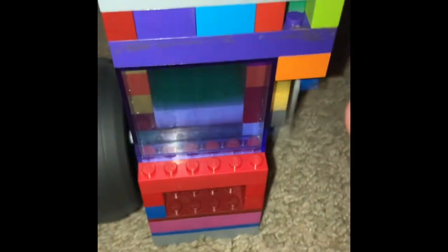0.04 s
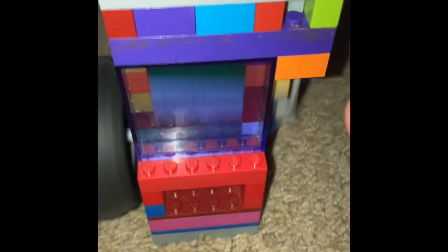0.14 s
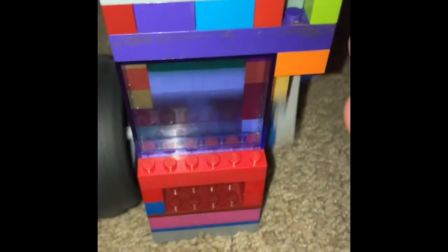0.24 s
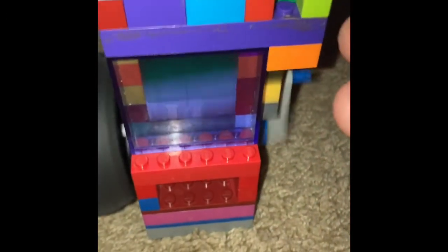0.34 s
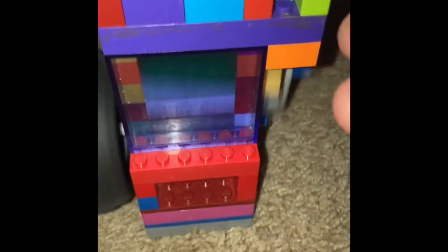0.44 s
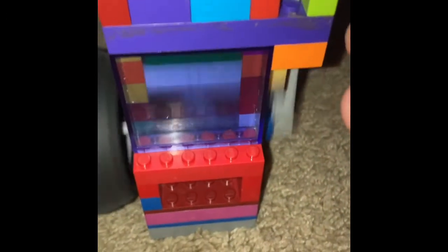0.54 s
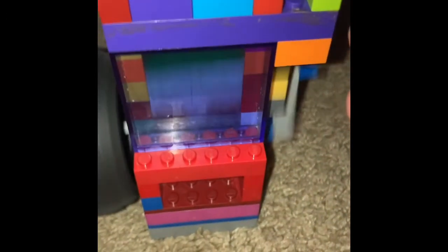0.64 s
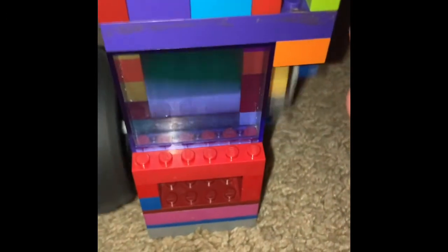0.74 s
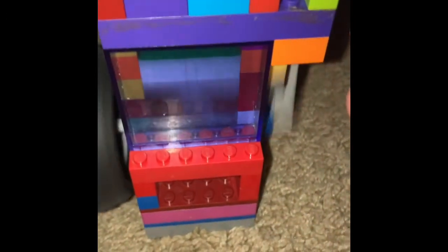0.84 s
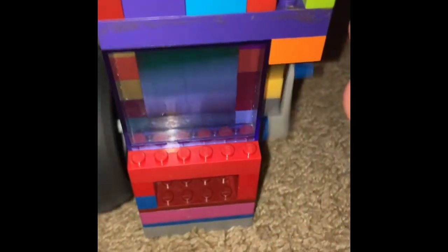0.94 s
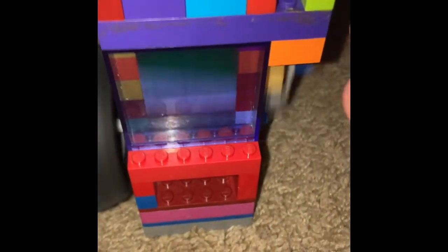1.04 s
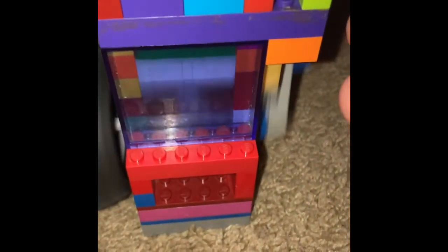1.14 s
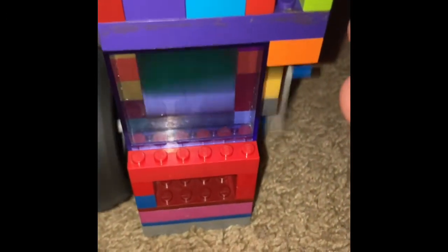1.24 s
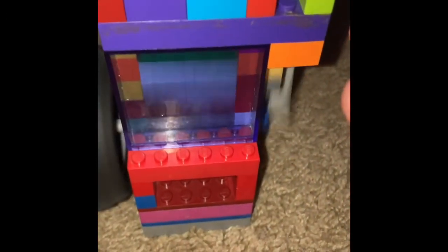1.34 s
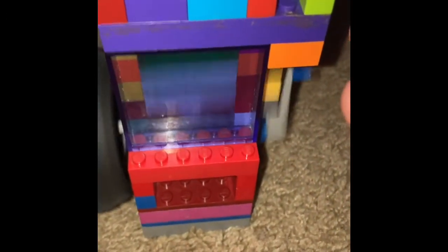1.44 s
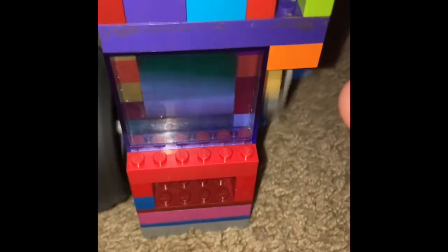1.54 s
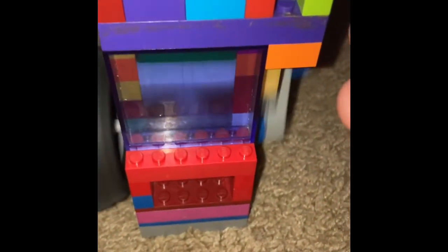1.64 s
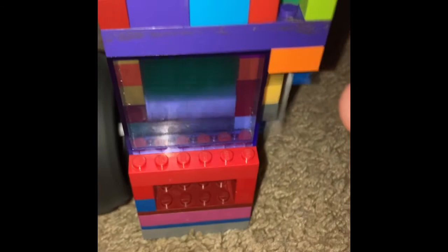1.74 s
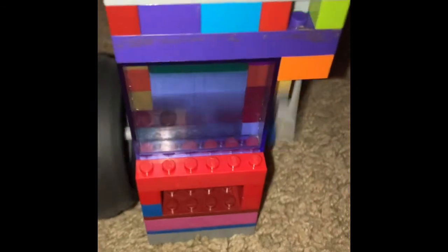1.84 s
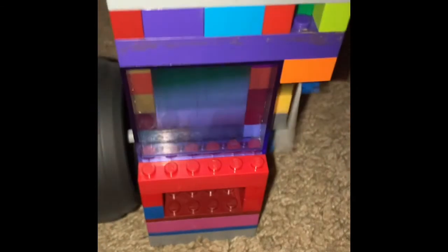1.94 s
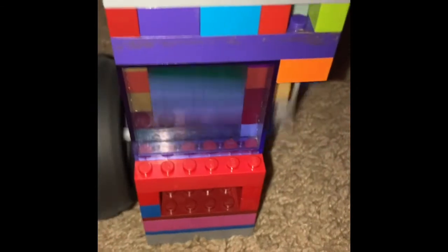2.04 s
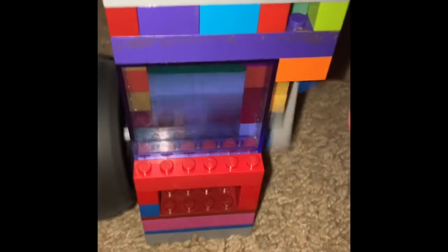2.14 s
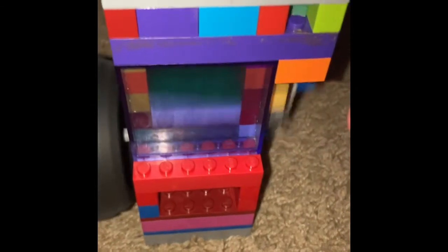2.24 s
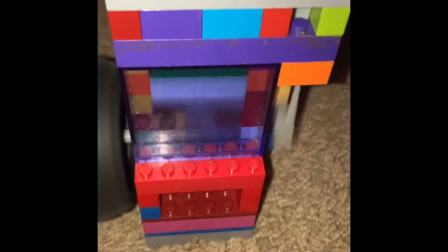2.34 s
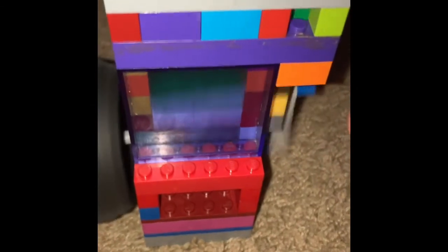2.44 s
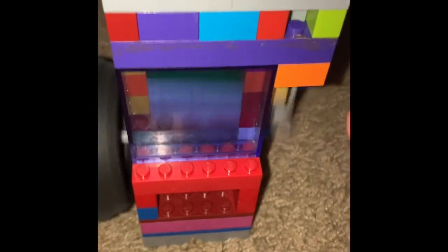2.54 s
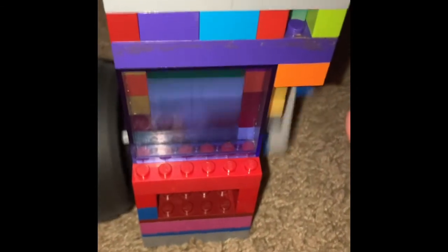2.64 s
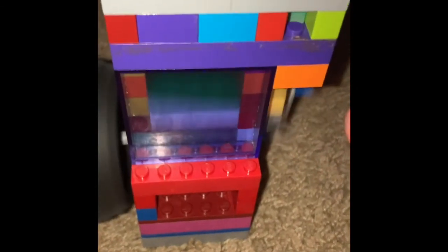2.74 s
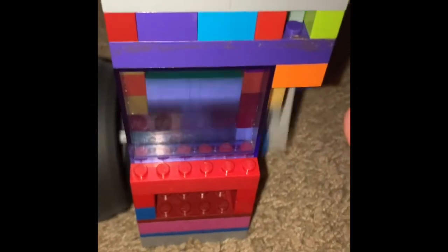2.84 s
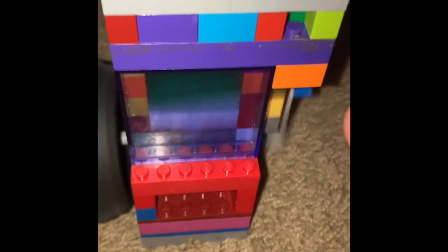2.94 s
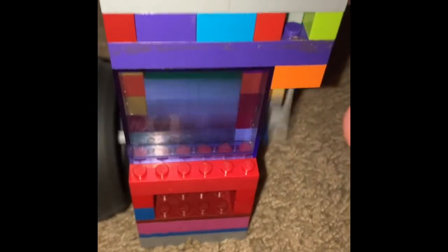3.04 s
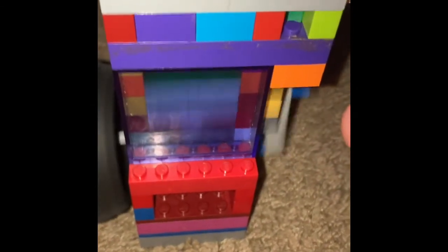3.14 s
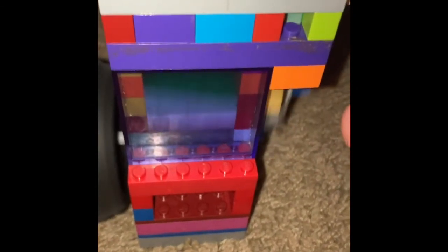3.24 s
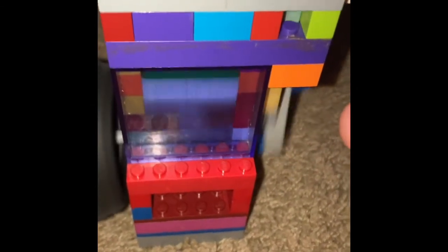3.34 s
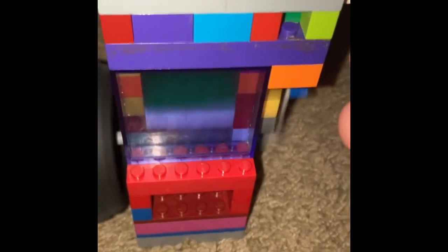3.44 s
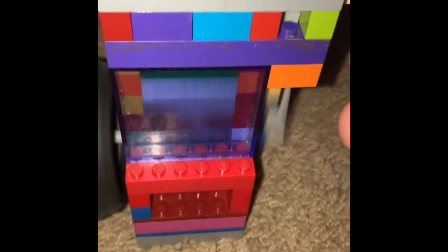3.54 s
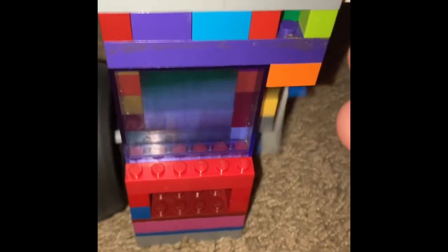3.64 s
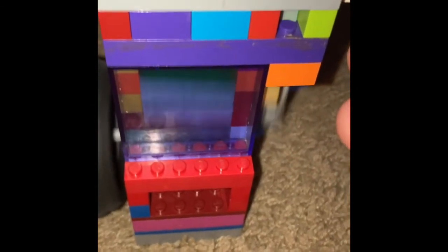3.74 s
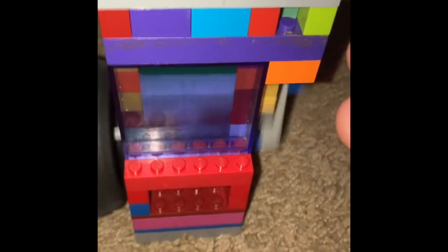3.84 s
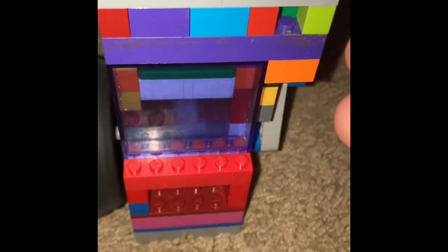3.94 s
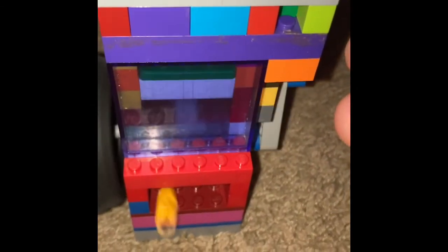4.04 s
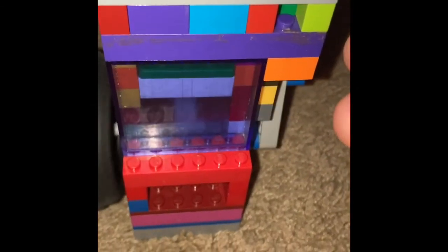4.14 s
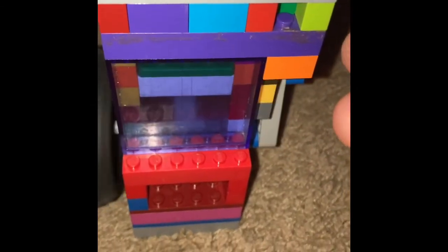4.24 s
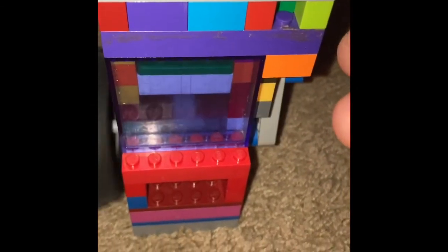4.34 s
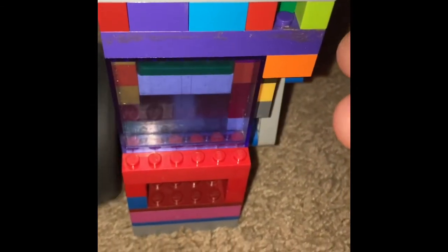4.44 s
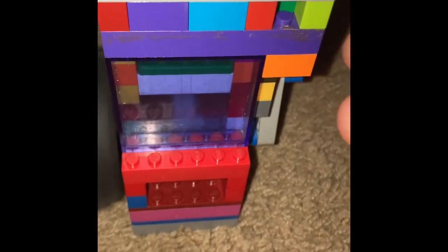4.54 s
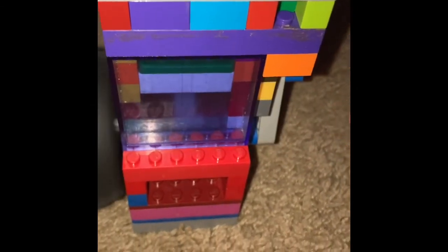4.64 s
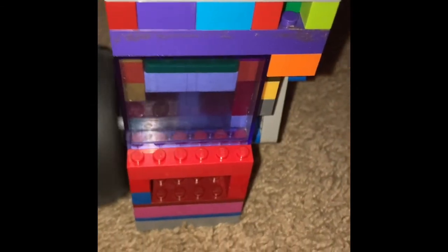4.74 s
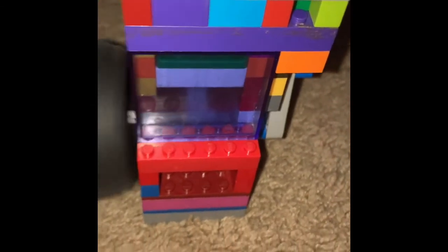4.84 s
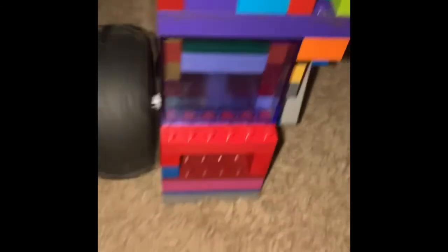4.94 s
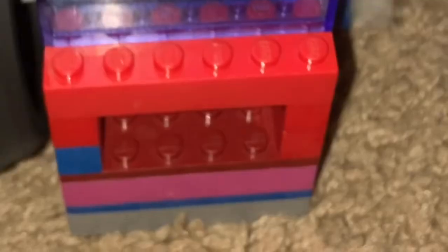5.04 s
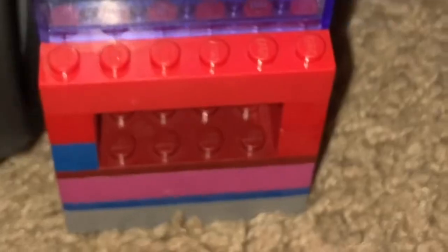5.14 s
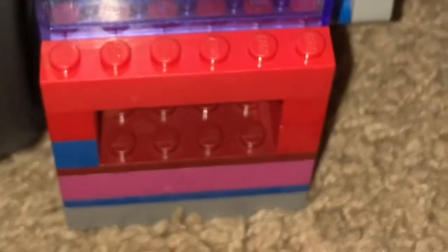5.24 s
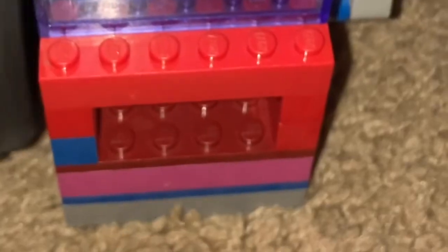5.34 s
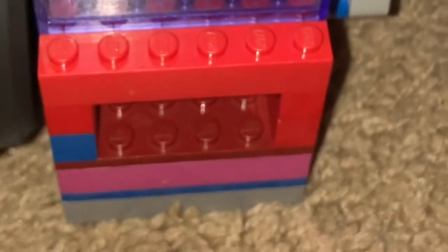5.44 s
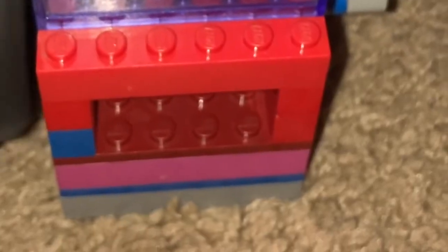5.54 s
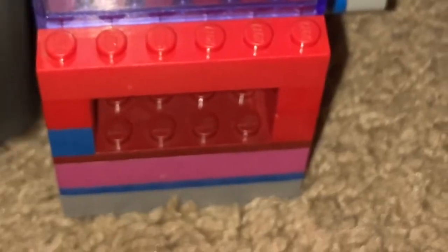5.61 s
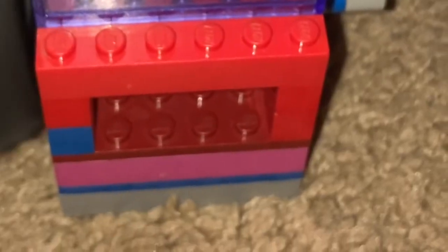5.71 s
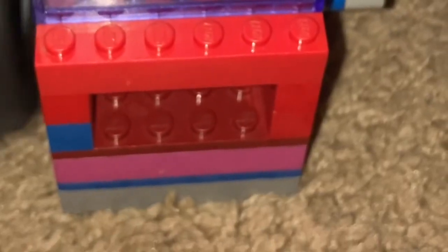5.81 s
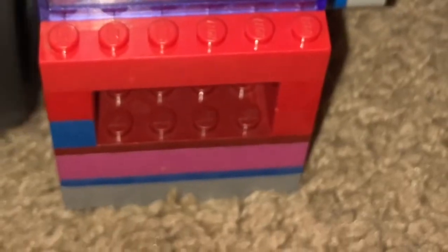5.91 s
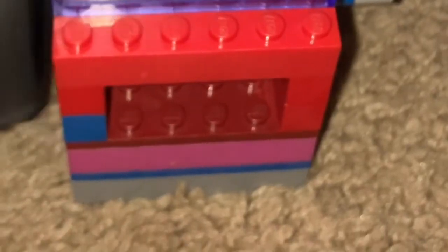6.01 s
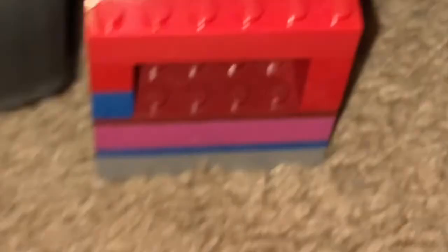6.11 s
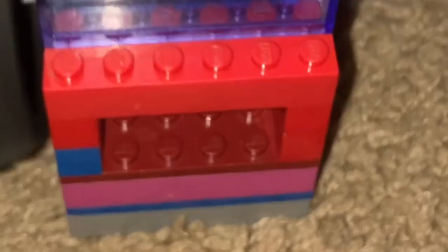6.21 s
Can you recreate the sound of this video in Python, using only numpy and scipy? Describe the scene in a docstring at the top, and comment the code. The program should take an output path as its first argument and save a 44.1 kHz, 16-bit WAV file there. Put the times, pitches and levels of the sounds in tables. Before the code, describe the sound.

A toy-brick piston engine rattles quickly and steadily, its loose plastic parts clicking over a buzzing flutter of air. It stops abruptly with small clacks, and a soft suction roar, hiss and hum rise behind it. A very short burst of the same rattle ends in another stall, and a slower, deeper burst follows at the end. The microphone is close, in a carpeted room with little echo.

```python
"""On a carpet, close by: a single-piston vacuum engine of plastic toy bricks runs at 24 turns/s.
Each turn gulps air and knocks the loose piston and valve against the brick housing; the suction
hums and hisses behind. The engine stalls with two small clacks. Background roar, hiss and hum
come up after the stall, as the recorder's gain recovers.
The last turns and the stall replay once; a few turns then replay at 2/3 speed, lower in pitch."""
import sys
import numpy as np
from scipy import signal
from scipy.fft import rfft, irfft
from scipy.io import wavfile
from scipy.ndimage import map_coordinates

SR = 44100
rng = np.random.default_rng(int(sys.argv[2]) if len(sys.argv) > 2 else 0)


def materialize(psi):
    """Save the field psi as 16-bit PCM at rate SR to the path in sys.argv[1].

    A 1-D psi becomes a single channel; in a 2-D psi each row is a channel.
    """
    bounded = np.clip(np.atleast_2d(psi).T, -1, 1)
    quanta = np.round(bounded * 32767).astype(np.int16)
    wavfile.write(sys.argv[1], SR, quanta)


N = 276507
TIME_S, FREQ_HZ = np.arange(N) / SR, np.fft.rfftfreq(N, 1 / SR)

# Table levels are relative.
# noise spectra of suction roar, suction hiss and port air: f/Hz, density/dB
ROAR_SPECTRUM = [(26, -39), (56, -20), (112, -3), (148, -8), (195, 1), (300, 1.5), (375, -4), (525, -15.5),
                 (690, -3.5), (780, -8.5), (930, -6.5), (1140, -15.5), (2250, -23), (5900, -23.5)]
HISS_SPECTRUM = [(1000, -41), (2500, -11.5), (5100, -15.5), (5900, -2.5), (8200, -4), (10200, 2),
                 (12500, -0.5), (16000, 0.5), (17500, -40)]
PORT_SPECTRUM = [(20, -10), (70, -4), (220, 7), (340, 7), (500, -4), (650, 2.5), (850, 5.5), (1020, 5.5),
                 (1330, 11), (1550, 4.5), (1750, 7), (2400, 2), (2800, 5.5), (3300, -1), (4100, 5.5),
                 (5200, -10), (6000, 8), (7100, -3.5), (9600, 1.5), (12500, -9.5), (16000, -5.5),
                 (17500, -40)]
# suction motor tones at full gain: f/Hz, level/dB
MOTOR_TONES = [(120, -45.5), (246, -48), (639, -38), (900, -47)]
# crank run-up, run and stall: t/s, speed/(turns/s)
CRANK_SPEED = [(0, 22.486), (.25, 23.034), (.65, 23.238), (.95, 23.834), (1.3, 24.011), (1.6, 24.192),
               (1.85, 24.222), (2.05, 24.19), (2.3, 23.884), (2.6, 24.161), (2.9, 24.083), (3.35, 24.129),
               (3.65, 24.261), (3.85, 24.145), (3.93, 0)]
# cylinder air pulsation: crank harmonic, level/dB
AIR_HARMONICS = [(1, -66), (2, -53), (3, -29), (4, -46.5), (5, -30.5), (6, -50.5), (7, -33), (8, -34.5),
                 (9, -36), (10, -37), (11, -39), (17, -46.5)]
# cylinder air ringing as a port opens:
# phase/turns, length/s, start f/Hz, end f/Hz, level/dB, slack gain/dB, slack lead/turns
PORT_GULPS = [(.193, .00965, 224, 648, -20, -0.5, 0.01), (0.312, .0027, 420, 623, -18.5, -4.5, 0.017),
              (0.409, 0.0051, 620, 814, -30.5, 0, .02), (0.535, .00354, 1024, 756, -21, -19, -0.033),
              (0.69, 0.012, 454, 319.3, -29, 0, 0.0043)]
# piston, rod and valve contacts: phase/turns, knock/dB, click/dB, click f/Hz, first rebound/s,
# scrape/dB, scrape decay/s, slack gain/dB, slack lead/turns
TURN_CONTACTS = [(0, -52, 2, 9500, .001, -2.5, 0.0029, 1.3, 0),
                 (.0067, -2.5, 2, 4150, .00072, 0, .0025, 1, -0.002),
                 (0.0235, -2.5, -9, 8000, .0006, 0.5, 0.0055, 1, -0.0016),
                 (.214, -11.5, -6.5, 10000, .0005, 3.5, 0.0021, 2, .01),
                 (.287, -52, -2.5, 8850, .0004, 1.5, .002, 0, .02),
                 (.305, -2.5, -12, 4200, .0008, 1, .0028, 1.5, 0.0196),
                 (.429, -4, -8, 6250, .0007, 0, .0028, -2, 0.0208),
                 (.454, -60, -2, 9800, .00042, -4, 0.0011, -5, .005),
                 (.468, -16.5, -1.5, 4450, .00065, 1.5, 0.0075, 2, .008),
                 (.545, -18, -0.5, 7800, 0.0006, 4, 0.0053, 1, -.05),
                 (.703, -46, 5, 8880, .00025, -2, 0.0033, -0.5, .008),
                 (.795, -17.5, -4, 4100, 0.00089, 6, .003, 7.5, .004),
                 (.874, -38, -0.5, 8100, .0007, 0, 0.0041, 4, .004),
                 (.934, -6, -9.5, 4730, 0.00084, 2, 0.0026, 0.5, -0.0041)]
# piston rocking to rest: t/s, knock/dB, click/dB, click f/Hz, scrape decay/s, ring f/Hz, ring/dB
STALL_CONTACTS = [(3.8888, -22, -1, 2690, .003, 970, -24), (3.8905, -15, -1, 4100, .003, 2230, -28),
                  (3.8924, -13, 5.5, 6500, .006, 875, -24), (3.898, -28, 0, 2890, 0.0055, 2690, -26),
                  (3.9025, -28, 2.5, 4200, 0.006, 4230, -35), (3.9205, -30, 4.5, 3800, .004, 1640, -25.5)]
# brick housing modes: f/Hz, width/Hz, level/dB
HOUSING_MODES = [(840, 95, -28), (1154, 81, -22.5), (1283.6, 64, -9.5), (1365, 52.3, -8.5), (1686, 99, -17),
                 (2120, 120, -17), (2810, 260, -15.5), (4030, 220, -16), (4800, 220, -20)]
# plastic clicking on plastic: f/Hz, level/dB
CLICK_SPECTRUM = [(310, -7.5), (1020, -8), (1900, 0.5), (2380, -8.5), (2800, 2.5), (3200, -7.5), (4050, 2),
                  (4700, 4), (5300, -13), (5900, -4.5), (7050, -3), (8400, -0.5), (9550, 5), (12100, 3.5),
                  (15900, -10), (17500, -42)]
# left-right likeness of near and far sources: f/Hz, correlation
NEAR_CORRELATION = [(60, 0.75), (300, 0.89), (700, 0.73), (1500, 0.55), (4100, 0.69), (5350, 0.91),
                    (6700, 0.95), (8300, 1), (10200, 0.92), (11700, 1), (15000, 0.79)]
FAR_CORRELATION = [(60, 0.99), (300, 0.98), (700, 0.66), (1400, 0.27), (3000, 0.035), (5300, 1),
                   (6700, 0.51), (8300, 1), (10200, 0.94), (11700, 1), (15000, 0.49)]
# phase of left ahead of right: f/Hz, lead/rad
LEFT_LEAD = [(20, 0), (750, -.1), (1400, -.9), (2100, -.6), (2600, -1.4), (2900, -2.4), (3350, -3.2),
             (4100, -4.3), (4600, -3.6), (5300, -3.14), (5700, -3), (7500, -1), (8500, 0), (10000, 1.3),
             (11700, 3.14), (13000, 4.4), (14300, 6.2), (16000, 6.9)]
# left minus right: f/Hz, level/dB
LEFT_BALANCE = [(70, -3.5), (130, -1), (280, -1.2), (550, -0.5), (1400, -0.2), (4000, -1), (9000, 0)]
# first pass and two replays: start t/s, end t/s, scene t/s at start, speed ratio
PASSES = [(-.1, 4.94, -.1, 1), (4.94, 6.14, 3.7067, 1), (6.14, 6.4, 3.696, 2 / 3)]

STALL_S = 3.895


def amp(db):
    """dB to gain."""
    return 10 ** (np.asarray(db) / 20)


def unit_rms(x):
    """Scale to rms 1."""
    return x / np.sqrt(np.mean(x ** 2) + 1e-20)


def over_hz(table):
    """Interpolate a table along log frequency."""
    hz, value = np.transpose(table)
    return np.interp(np.log(FREQ_HZ + 1), np.log(hz + 1), value)


def ramp(start_s, length_s):
    """Linear rise from 0 to 1, then hold."""
    return np.clip((TIME_S - start_s) / length_s, 0, 1)


def drift(rate_hz):
    """Slow random wander, rms 1."""
    return unit_rms(irfft(rfft(rng.standard_normal(N)) * np.exp(-(FREQ_HZ / rate_hz) ** 2), N))


def stereo_noise(spectrum, correlation):
    """Coloured noise, partly alike left and right, rms 1."""
    left, independent = rfft(rng.standard_normal((2, N)))
    shared = np.clip(over_hz(correlation), -1, 1)
    right = shared * left + np.sqrt(1 - shared ** 2) * independent
    return unit_rms(irfft(np.array([left, right]) * amp(over_hz(spectrum)), N))


def coloured(x, spectrum):
    """Minimum-phase filter of unit power."""
    log_gain = np.log(unit_rms(amp(over_hz(spectrum))))
    cepstrum = irfft(log_gain, N)[:1024] * np.r_[1, np.full(1023, 2)]
    return irfft(rfft(x) * np.exp(rfft(cepstrum, N)), N)


def low_cut(x, hz):
    """Second-order high-pass."""
    return signal.sosfilt(signal.butter(2, hz, "high", fs=SR, output="sos"), x)


def ring(x, hz, width_hz):
    """One mode: a unit impulse starts a decaying sine of height 1."""
    pole = np.exp((2j * np.pi * hz - np.pi * width_hz) / SR)
    return signal.lfilter([1], [1, -pole], x + 1e-18).imag


def impulses(at_s, sizes):
    """Impulse train, t > 0 only."""
    samples = np.clip(np.round(at_s * SR).astype(int), 0, N)
    return np.bincount(samples, sizes * (at_s > 0), N + 1)[:N]


def each_turn(turns, phase):
    """Times/s at which the crank passes a phase."""
    return np.interp(np.arange(-1, int(turns[-1])) + phase, turns, TIME_S)


def suction(held_gain_db=-8, air_step_db=4, tone_step_db=5.84, pitch_rise=.008, waver=.0025):
    """Distant roar, hiss and hum; up in two timed steps after the stall, as recorder gain recovers."""
    before_step = 1 - ramp(start_s=4.34, length_s=.17)
    pitch = 1 - pitch_rise * before_step
    tones = np.zeros(N)
    for hz, db in MOTOR_TONES:
        tone_hz = hz * pitch * (1 + waver * drift(rate_hz=8.6))
        tones += amp(db) * np.sqrt(2) * np.sin(2 * np.pi * np.cumsum(tone_hz) / SR)
    roar = amp(-30.5) * stereo_noise(ROAR_SPECTRUM, FAR_CORRELATION)
    hiss = amp(-33) * stereo_noise(HISS_SPECTRUM, FAR_CORRELATION)
    air = amp(-air_step_db * before_step) * (roar + hiss)
    motor = amp(-tone_step_db * before_step) * tones
    gain_held = 1 - ramp(STALL_S, length_s=.041)
    return amp(held_gain_db * gain_held) * (air + motor)


def room(x, t60_s=.24, gap_s=.003):
    """Carpeted room: short diffuse stereo tail, little bass."""
    t = np.arange(SR // 4) / SR
    tail = rng.standard_normal((2, len(t))) * amp(-60 * t / t60_s) * (t > gap_s)
    tail = low_cut(tail, hz=600)
    return signal.oaconvolve(x, tail / np.linalg.norm(tail[0]), axes=1)[:, :N]


def crank(first_knock_s=.0297, run_down_s=.051):
    """Engine state: turns since the first knock, slack (1 to 0 as the parts settle), drive/dB."""
    turns = np.cumsum(np.interp(TIME_S, *np.transpose(CRANK_SPEED))) / SR
    turns -= np.interp(first_knock_s, TIME_S, turns)
    slack = 1 - ramp(start_s=.58, length_s=.38)
    drive = 1 - ramp(STALL_S - run_down_s, run_down_s)
    return turns, slack, 20 * np.log10(drive + 1e-6)


def port_air(turns, throb_db=2, widest_turns=.933):
    """Air hisses through the ports, swelling on both strokes."""
    throb = np.cos(4 * np.pi * (turns - widest_turns))
    return amp(-27.5 + throb_db * throb) * stereo_noise(PORT_SPECTRUM, NEAR_CORRELATION)


def pulsation(turns, slack, lag_turns=.1548, spread_turns=.05677, tilt_db=.28, waver_db=.1):
    """Piston push and pull: mostly odd harmonics, the higher ones later and stronger with slack."""
    wave = np.zeros(N)
    for k, db in AIR_HARMONICS:
        delayed_turns = turns - lag_turns - spread_turns * k
        wave -= amp(db + tilt_db * k * slack) * np.cos(2 * np.pi * k * delayed_turns)
    return wave * amp(waver_db * drift(rate_hz=10))


def gulps(turns, slack, jitter_s=.00004):
    """Cylinder air rings in a short glide as each port opens."""
    out = np.zeros(N)
    for phase, length_s, start_hz, end_hz, db, slack_db, lead_turns in PORT_GULPS:
        t = np.arange(0, length_s, 1 / SR)
        gulp = -signal.chirp(t, start_hz, length_s, end_hz, phi=-90) * np.sin(np.pi * t / length_s)
        at_s = each_turn(turns + lead_turns * slack, phase)
        late_s = jitter_s * rng.standard_normal(len(at_s)) * (at_s > 0)
        sizes = amp(db + slack_db * np.interp(at_s, TIME_S, slack))
        out += signal.oaconvolve(impulses(at_s + late_s, sizes), gulp)[:N]
    return out


def loose_parts(width_hz=120):
    """Parts drop back at the stall, each ringing at its own pitch."""
    return sum(ring(impulses(np.array([at_s]), amp(db)), hz, width_hz)
               for at_s, *_, hz, db in STALL_CONTACTS)


def running_blows(turns, slack, drive_db, easing_s=1.7, drive_exponent=3.4):
    """Piston, rod and valve strike every turn: hard at first, easing, dying with the drive."""
    for phase, knock_db, click_db, hz, rebound_s, scrape_db, decay_s, slack_db, lead in TURN_CONTACTS:
        at_s = each_turn(turns + lead * slack, phase)
        late, hard, sharp = rng.standard_normal((len(at_s), 3)).T
        force_db = np.interp(at_s, TIME_S, drive_exponent * drive_db + slack_db * slack)
        early = np.exp(-at_s / easing_s)
        knocks_db = knock_db + force_db + .28 + 3.5 * early + hard
        clicks_db = click_db + force_db - .12 + 1.6 * early + 1.5 * sharp
        jitter_s = .00001 + .00005 * np.sin(np.pi * phase)  # tightest at the main knock
        at_s = at_s + jitter_s * late * (at_s > 0)
        yield at_s, knocks_db, clicks_db, hz, rebound_s, scrape_db, decay_s


def stall_blows(rebound_s=.00082, scrape_db=-1):
    """The piston rocks to rest in single blows."""
    for at_s, knock_db, click_db, hz, decay_s, _, _ in STALL_CONTACTS:
        yield np.array([at_s]), knock_db, click_db, hz, rebound_s, scrape_db, decay_s


def clatter(*blow_sets, restitution=.55, click_width_hz=1700):
    """Each blow rings the housing and gives a pitched tick, two rebounds and a short scrape."""
    grit = stereo_noise([(20, 0)], NEAR_CORRELATION)  # white
    knocks, clicks = np.zeros(N), np.zeros((2, N))
    ring_gain = amp(-4) * np.sqrt(4 * np.pi * click_width_hz / SR)
    for blows in blow_sets:
        for at_s, knock_db, click_db, hz, rebound_s, scrape_db, decay_s in blows:
            knocks += impulses(at_s, amp(knock_db))
            ticks = impulses(at_s, amp(click_db))
            envelope = signal.lfilter([1], [1, -np.exp(-1 / (decay_s * SR))], ticks + 1e-18)
            scrape = amp(scrape_db) * np.sqrt(2 / (decay_s * SR)) * envelope * grit
            for k, delay_s in ((1, rebound_s), (2, rebound_s * (1 + restitution))):
                ticks += impulses(at_s + delay_s, amp(click_db) * restitution ** k * (at_s > 0))
            burst = ticks + scrape
            clicks += burst + ring_gain * ring(burst, hz, click_width_hz)
    knocks = low_cut(knocks, hz=650)  # the small housing radiates little bass
    housing = sum(amp(db) * ring(knocks, hz, width_hz) for hz, width_hz, db in HOUSING_MODES)
    return amp(-13) * housing + amp(-11.5) * coloured(clicks, CLICK_SPECTRUM)


def scene(air_db=.32, room_db=-16, low_cut_hz=36):
    """Suction, room and engine, placed in stereo by level and phase."""
    turns, slack, drive_db = crank()
    air = pulsation(turns, slack) + gulps(turns, slack) + port_air(turns)
    plastic = clatter(running_blows(turns, slack, drive_db), stall_blows()) + loose_parts()
    engine = amp(air_db + drive_db) * air + plastic
    mix = engine + amp(room_db) * room(engine) + suction()
    left_gain = amp(over_hz(LEFT_BALANCE) / 2) * np.exp(.5j * over_hz(LEFT_LEAD))
    bass_rolloff = 1 - 1 / (1 + (FREQ_HZ / low_cut_hz) ** 4)
    return irfft(rfft(mix) * bass_rolloff * np.array([left_gain, 1 / left_gain]), N)


def record(dry, ceiling=.85, fade_in_s=.036, fade_out_s=.029, cutoff_hz=15880):
    """Round off peaks, join the passes with short fades, low-pass. Slow replay lowers the pitch."""
    limited = dry / (1 + (dry / ceiling) ** 4) ** .25
    out = np.zeros((2, N))
    for start_s, end_s, scene_s, speed in PASSES:
        fade = ramp(start_s, fade_in_s) * np.clip((end_s - TIME_S) / fade_out_s, 0, 1)
        heard = fade > 0
        samples = np.round((scene_s - start_s * speed) * SR) + speed * np.arange(N)[heard]
        played = np.array([map_coordinates(side, [samples], order=5) for side in limited])
        out[:, heard] += fade[heard] * played
    low_pass = signal.firwin(511, cutoff_hz, window=("kaiser", 9), fs=SR)
    return signal.oaconvolve(out, low_pass[None], "same")


dry = scene()
out = record(dry)
materialize(out)
```